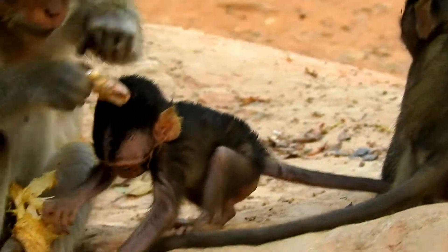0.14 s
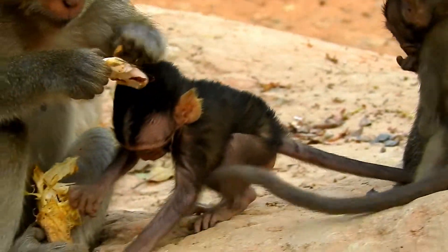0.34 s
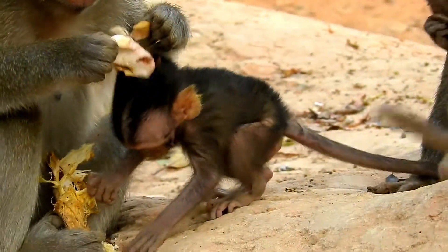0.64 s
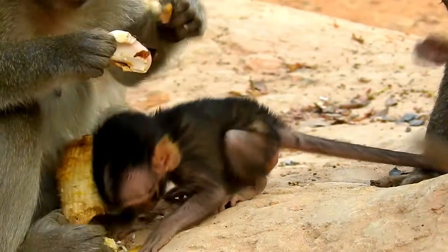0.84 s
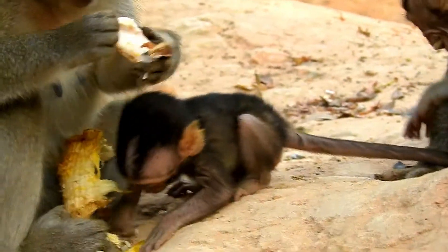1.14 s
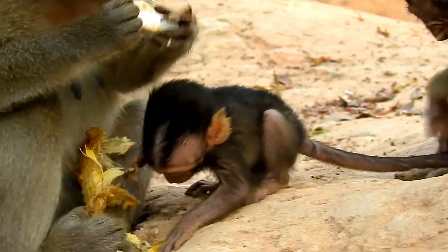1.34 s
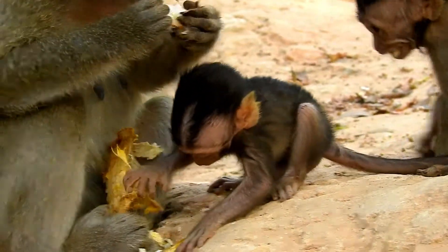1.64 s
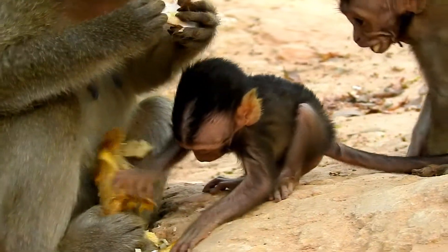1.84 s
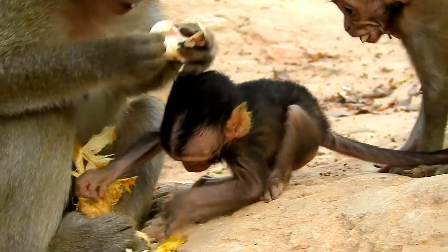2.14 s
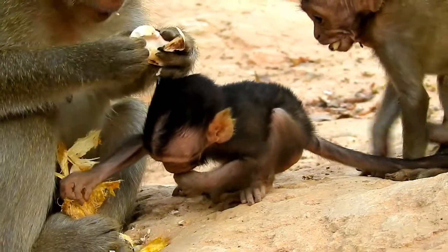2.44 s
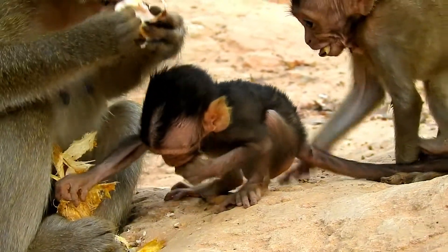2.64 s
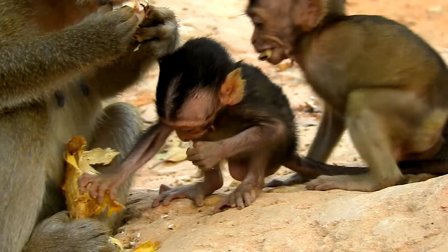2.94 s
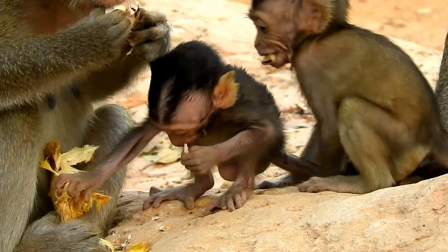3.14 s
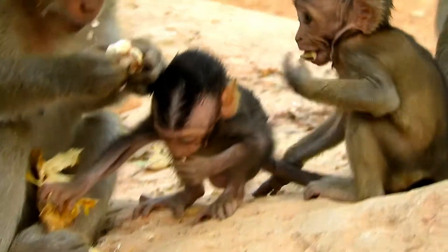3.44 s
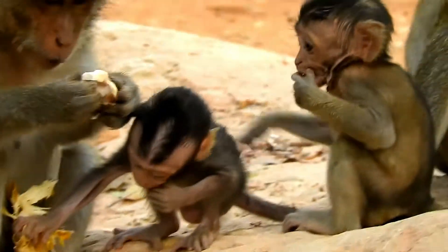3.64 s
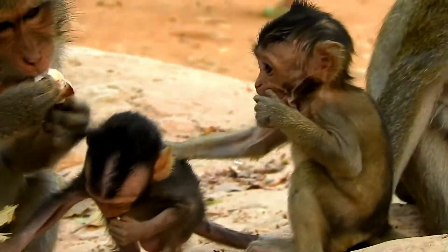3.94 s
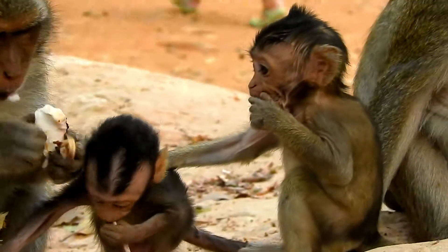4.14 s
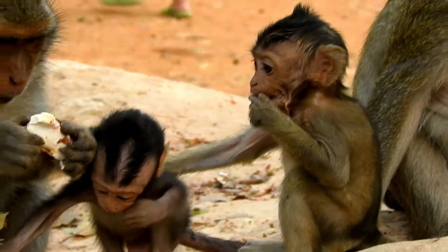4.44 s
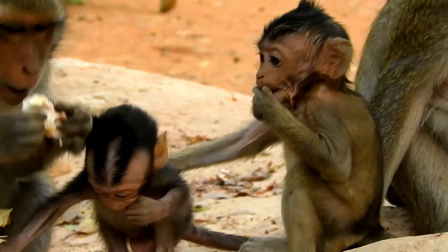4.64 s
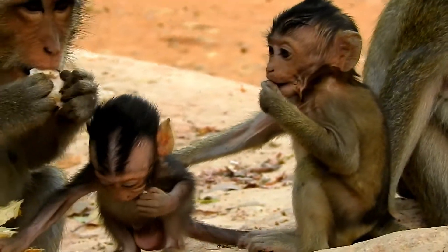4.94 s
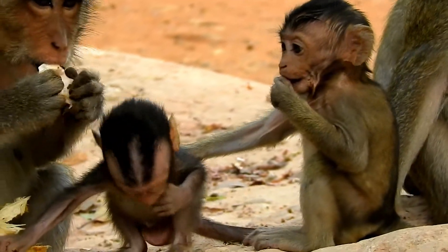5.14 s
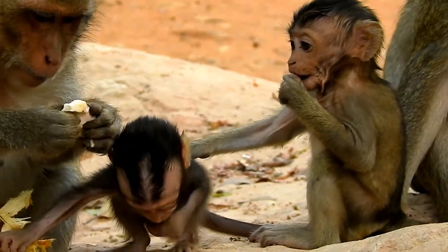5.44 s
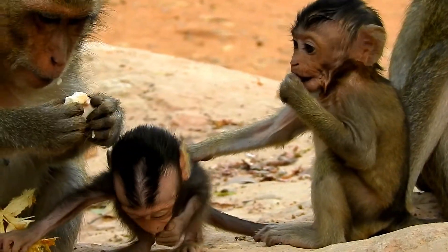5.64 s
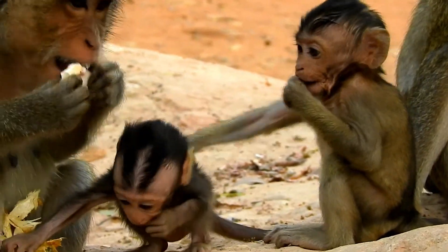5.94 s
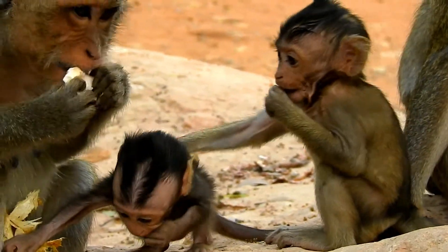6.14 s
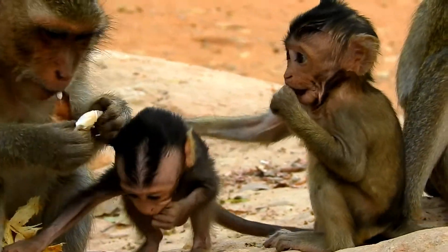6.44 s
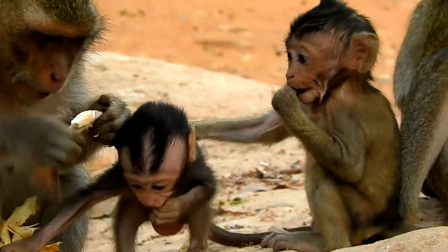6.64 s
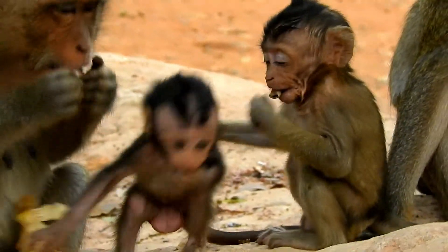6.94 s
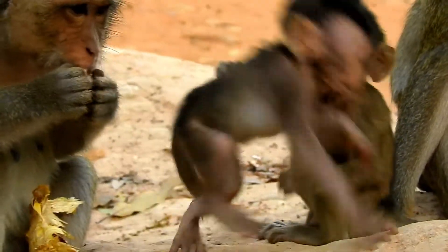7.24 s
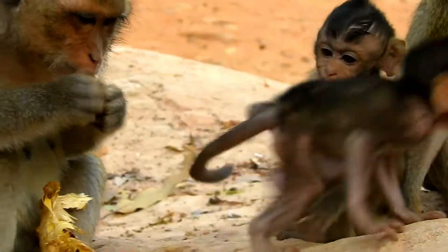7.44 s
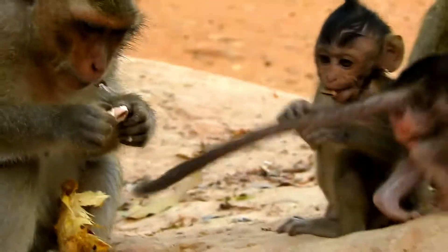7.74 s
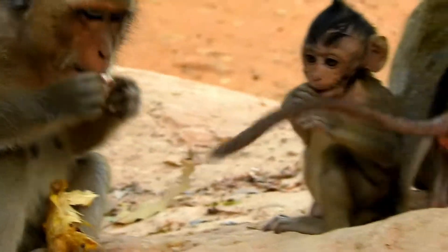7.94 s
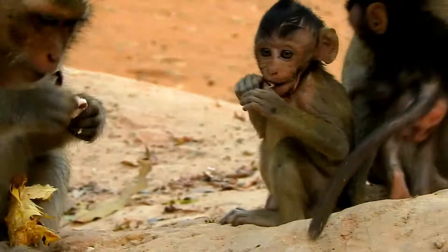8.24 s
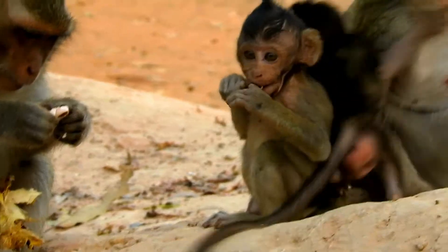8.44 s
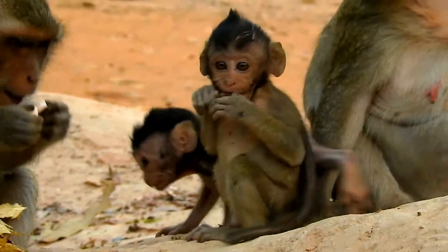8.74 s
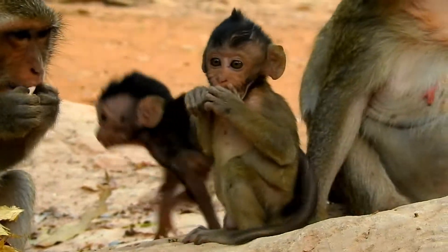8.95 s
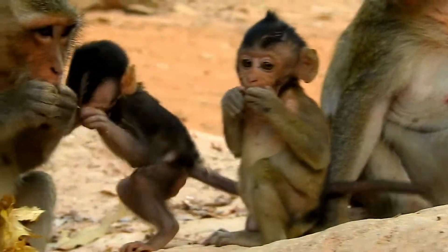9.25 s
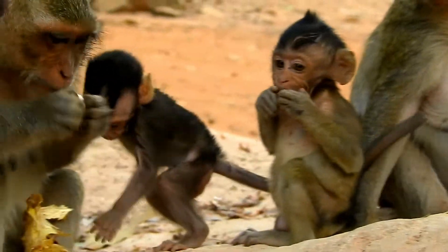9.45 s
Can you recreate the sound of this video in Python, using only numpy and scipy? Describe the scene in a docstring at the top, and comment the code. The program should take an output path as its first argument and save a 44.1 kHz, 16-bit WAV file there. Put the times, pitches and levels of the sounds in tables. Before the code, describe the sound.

For about nine and a half seconds, a close cicada on the left holds a piercing, buzzing whine, mainly near 4.9 kHz with a thinner tone near 8.2 kHz. Its pitch zigzags slightly every 0.7 seconds, brightening in about three surges a second, smeared by echoes off trees. Distant insects add a blurred shimmer. Beneath, an engine idles with deep thumps at about seventeen per second over traffic rumble and broad hiss. Leaf rustles crackle at 1.1 to 1.7 seconds. Echoing bird whistles drop quickly and level out at 0.85, 3.9 and 5.95 seconds, with a very faint one at 7.7. The engine eases around 4.5 to 6.8, with a hollow pipe hum emerging, then grows louder and raspier from 7.2. Gritty scuffs come at 6.8 to 7.5 as the baby monkey scrambles, then leafy rustling at 8.5 and a sharper crackle at 8.8. Rumble and whine finish strongest.

```python
"""A cicada whines close on the left: a fast click train, summed from overtones of a rate that zigzags in a
repeating figure, with echoes off the trunks. More insects sing far off as noise in narrow bands.
An engine idles nearby, filtered firing pulses plus gas noise, over shaped-noise traffic rumble and hiss.
A bird drops falling whistles, swept sines, and monkeys scuff dry leaves and grit, trains of tiny cracks."""
import sys
import numpy as np
from scipy import signal
from scipy.fft import rfft, irfft, next_fast_len
from scipy.io import wavfile
from scipy.ndimage import uniform_filter1d, map_coordinates

SR = 44100
rng = np.random.default_rng(int(sys.argv[2]) if len(sys.argv) > 2 else 0)


def file_out(sig):
    """Save sig as 16-bit WAV at sys.argv[1]."""
    # one column per channel
    cols = np.atleast_2d(sig).T
    # limit, then scale
    lim = np.clip(cols, -1, 1)
    pcm = np.round(lim * 32767).astype(np.int16)
    wavfile.write(sys.argv[1], SR, pcm)


N = 423360
T = np.arange(N) / SR

# cicada overtones as multiples of the click rate; halves come from the two ribbed drums taking turns
MULTIPLES = [4, 5, 5.5, 6, 7, 8, 9, 10, 10.5, 11, 11.5, 12, 13, 14, 15, 15.5, 16, 17, 18, 19, 20, 21, 25]
# strength of each overtone: (relative level [dB], left over right [dB])
OVERTONES = [(-35, -3), (-6.5, 2), (-35, 2), (-31, 1), (-33, 2), (-30.5, 13), (-21, -4), (7.5, 4.5),
             (-33, 2), (-10.5, 9), (-61, -2), (-13, 10), (-23.5, -10), (-17.5, 0), (-3, 7.5), (-49, -1),
             (-22.5, 0), (-36, -2), (-58, 1), (-33.5, -6), (-19.5, 4), (-62, -4), (-59, 3)]


def amp(db):
    """Amplitude factor of a level in dB."""
    return np.exp(np.asarray(db) * np.log(10) / 20)


def unit(x):
    """x scaled to rms 1."""
    return x / np.sqrt(np.mean(x ** 2) + 1e-20)


def gain_at(points, hz):
    """Gain of (Hz, dB) points on a log frequency axis, -120 dB outside them."""
    f, db = np.transpose(points)
    level_db = np.interp(np.log(hz + 1), np.log(f + 1), db, left=-120, right=-120)
    return amp(level_db)


def curves(rows, t=T, period=None):
    """One value per sample for each column after the time."""
    s, *cols = np.transpose(rows)
    return [np.interp(t, s, c, period=period) for c in cols]


def wobble(knots_per_s):
    """Smooth random curve: a spline through normal knots."""
    knots = rng.standard_normal(int(N * knots_per_s / SR) + 4)
    return map_coordinates(knots, [T * knots_per_s])


def filtered(x, response):
    """x with its spectrum times response(hz), zero-padded against wrap-around."""
    m = next_fast_len(x.shape[-1] + 8192)
    hz = np.fft.rfftfreq(m, 1 / SR)
    return irfft(rfft(x, m) * response(hz), m)[..., :x.shape[-1]]


def stereo(pair):
    """Two unrelated signals shared between the microphone ports: alike in the bass, apart in the treble."""
    # left-right correlation: (frequency [Hz], correlation [0-1])
    likeness = [(60, .995), (200, .998), (630, .96), (1400, .86), (3000, .9), (6500, .4), (12000, .25)]
    f, alike = np.transpose(likeness)

    def mid_side_gains(hz):
        correlation = np.interp(np.log(hz + 1), np.log(f), alike)
        angle = np.arccos(np.clip(correlation, -1, 1)) / 2
        return np.array([np.cos(angle), np.sin(angle)])

    mid, side = filtered(pair, mid_side_gains)
    return np.array([mid + side, mid - side])


def noise(response):
    """Stereo noise of rms 1, coloured by response(hz)."""
    white = rng.standard_normal((2, N))
    return unit(filtered(stereo(white), response))


def trees(x, t60_s, wet_db):
    """x plus echoes off the trunks: clumpy decaying noise, dulled by leaves and air."""
    # echo colour: (frequency [Hz], gain [dB])
    echo_colour = [(1000, 0), (3000, 0), (5500, -5), (8000, -8), (15000, -13)]
    t = np.arange(SR) / SR
    decay = amp(-60 * t / t60_s + 3 * wobble(40)[:SR])
    tail = stereo(rng.standard_normal((2, SR))) * decay * (t > .01)
    tail = filtered(tail / np.linalg.norm(tail[0]), lambda hz: gain_at(echo_colour, hz))
    # the last second stands in for the sound before the start, so echoes are there from the first sample
    extended = np.hstack([x[:, -SR:], x])
    echoes = signal.fftconvolve(extended, tail, axes=1)
    return x + amp(wet_db) * echoes[:, SR:SR + N]


def cicada():
    """Overtones of the click rate; echoes of earlier pitches beat against the present one."""
    # turning points of the repeating zigzag: (time in figure [s], click rate [1/s])
    zigzag = [(0, 542.4), (.14, 551.4), (.225, 546.5), (.28, 551.4), (.335, 544.2), (.42, 551),
              (.55, 544.5), (.625, 549.6)]
    # course of the song: (time [s], loudness [dB], belly resonance on low overtones [dB])
    song_course = [(0, -27, -3), (1, -27.5, -1), (6.8, -27, -0.5), (7.6, -26, -0.5), (9.6, -24.5, -8.5)]
    figure_s, surge_s = .677, .19
    rest_effort_db, surge_db = -3.2, 3.2  # spectral tilt per 4 multiples about the 8th

    rate, = curves(zigzag, period=figure_s)
    rate = uniform_filter1d(rate, size=700)
    rate = rate + .4 * wobble(1.2) + .4 * wobble(25)
    phase = 2 * np.pi * np.cumsum(rate) / SR

    # two surges a figure, the first at surge_s
    surge = np.cos(2 * np.pi * (T - surge_s) / figure_s) ** 4
    effort_db = rest_effort_db + surge_db * surge + 1.3 * wobble(9)
    loudness_db, belly_db = curves(song_course)
    shimmer_db = 2.7 * wobble(6)  # moving air makes each overtone swell and sink on its own

    song = np.zeros((2, N))
    starts = rng.uniform(0, 2 * np.pi, len(MULTIPLES))
    for k, (db, pan_db), start in zip(MULTIPLES, OVERTONES, starts):
        # more effort is brighter
        level = amp(db + effort_db * (k - 8) / 4 + belly_db * (k < 9))
        level *= amp(np.roll(shimmer_db, int(k * SR / 3)))
        left = level * np.exp(1j * (k * phase + start))
        right = left * np.exp(-.007j * k * k)  # right port lags, the high overtones most
        song += amp([[pan_db / 2], [-pan_db / 2]]) * np.real([left, right])
    return amp(loudness_db) * trees(song, t60_s=.55, wet_db=3)


def chorus():
    """Far cicadas of the same kind, a little lower and blurred, and other insects: noise in narrow bands."""
    # other far insects: (centre [Hz], width [Hz], level [dB])
    other_insects = [(1579, 59, -56), (2668, 325, -46.5), (5360, 560, -43), (5500, 480, -45.5),
                     (8310, 830, -51.5), (9350, 80, -58), (12080, 81, -67.5), (13300, 70, -69)]
    cicadas = [(542.5 * k, 8 * k, db - 32 - .4 * k) for k, (db, _) in zip(MULTIPLES, OVERTONES)]
    voices = cicadas + other_insects

    def band(hz, centre_hz, width_hz, db):
        density = np.sqrt(SR / width_hz / 2)  # keeps band power independent of width
        return amp(db) * density * np.exp(-2 * ((hz - centre_hz) / width_hz) ** 2)

    insects = filtered(stereo(rng.standard_normal((2, N))), lambda hz: sum(band(hz, *v) for v in voices))
    return insects * amp([[1.5], [-1.5]]) * amp(1.5 * wobble(6.5))


def engine():
    """One exhaust thump per firing with a puff of gas noise, plus pipe resonance, drone and rasp."""
    # running state: (time [s], firing rate [1/s], level [dB], pipe resonance level [dB])
    running = [(0, 16.5, -36.5, -59), (3, 17.5, -33, -53.5), (4.5, 16.8, -38.5, -42.5),
               (6.8, 18.1, -39, -38.5), (7.25, 18.2, -30, -38.5), (8.5, 17.4, -26, -41.5),
               (9.6, 18.6, -26.5, -46)]
    # exhaust response: (frequency [Hz], gain [dB])
    exhaust = [(26, -40), (45, -21), (97, 0), (136, 3), (176, -14.5), (232, -3.5), (295, -26), (339, -17.5),
               (384, -28), (499, -36), (552, -26), (900, -42), (1170, -61), (1980, -120)]
    drone_db = -45.5
    rasp_db, rasp_onset_db, rasp_knee_db = -41, -29, 1.2  # comes in as the engine level passes the onset

    rate, level_db, pipe_db = curves(running)
    cycles = np.cumsum(rate + .06 * wobble(3)) / SR  # one per firing
    angle = 2 * np.pi * cycles
    firings = np.diff(np.floor(cycles), prepend=0) * amp(1.6 * wobble(18))

    thumps = unit(filtered(firings, lambda hz: gain_at(exhaust, hz)))
    puffs = unit(noise(lambda hz: gain_at(exhaust, hz)) * (1 + np.cos(angle)) ** 2)
    pipe = unit(filtered(firings, lambda hz: np.exp(-((hz - 330) / 28) ** 2)))
    drone = np.sqrt(2) * np.sin(angle * 3)  # third order of the firing rate

    rasp_gate = 1 / (1 + np.exp((rasp_onset_db - level_db) / rasp_knee_db))
    rasp_noise = noise(lambda hz: np.exp(-((hz - 470) / 150) ** 2))
    rasp = amp(rasp_db) * rasp_gate * (1 + .5 * np.cos(angle)) * rasp_noise

    body = amp(level_db) * (thumps + .57 * puffs)
    return body + amp(pipe_db) * pipe + amp(drone_db) * drone + rasp


def traffic():
    """Low rumble and the broad hiss of the surroundings, which swells with it."""
    # rumble course: (time [s], level [dB])
    rumble_course = [(0, -28.5), (5.5, -27.5), (7, -26), (8.6, -25.5), (9.6, -23.5)]
    # rumble and hiss spectra: (frequency [Hz], relative density [dB per Hz])
    rumble_colour = [(15, -63), (25, -33), (30, -23), (41, -16), (65, -3), (124, -1), (145, 0), (183, -5),
                     (281, -9), (311, -13.5), (379, -21), (500, -41), (650, -80), (1100, -120)]
    hiss_colour = [(250, -32), (400, -2), (700, -3), (1200, -6.5), (2000, -10), (3500, -13), (5000, -12),
                   (6300, -7.5), (7400, -12.5), (8500, -32), (9600, -32), (11000, -52), (13000, -70)]
    hiss_start_db, hiss_db_per_rumble_db = -39.5, 1

    rumble_db, = curves(rumble_course)
    hiss_db = hiss_start_db + hiss_db_per_rumble_db * (rumble_db - rumble_db[0])
    rumble = amp(rumble_db + .63 * wobble(3.11)) * noise(lambda hz: gain_at(rumble_colour, hz))
    hiss = amp(hiss_db + 1.2 * wobble(6)) * noise(lambda hz: gain_at(hiss_colour, hz))
    return rumble + hiss


def bird():
    """Each whistle is a sine that falls fast and levels out; the trees smear it."""
    # whistles: (time [s], start [Hz], end [Hz], fall time constant [s], length [s], level [dB])
    whistles = [(.852, 3450, 2190, .045, .3, -40.5), (3.895, 2600, 1940, .04, .2, -43),
                (5.955, 3800, 2175, .036, .28, -40), (7.68, 2600, 1950, .05, .14, -51)]
    out = np.zeros(N + SR)
    for s, start_hz, end_hz, fall_s, length_s, db in whistles:
        t = np.arange(int(length_s * SR)) / SR
        hz = end_hz + (start_hz - end_hz) * np.exp(-t / fall_s)
        hz = hz + 30 * wobble(80)[:len(t)]  # breathy waver
        shape = np.clip(t / .02, 0, 1) * (1 - t / length_s) ** .5
        tone = np.sin(2 * np.pi * np.cumsum(hz) / SR)
        out[round(s * SR):][:len(t)] += amp(db) * shape * tone
    flutter_and_pan_db = 3.6 * wobble(45) + [[.6], [-.6]]
    return trees(out[None, :N] * amp(flutter_and_pan_db), t60_s=1.4, wet_db=3)


def scuffs():
    """Hands and feet on dry leaves and grit: dense tiny uneven cracks under a quick rise and a fade."""
    # scuffs: (time [s], envelope time scale [s], level [dB], leaves over grit [dB])
    contacts = [(1.1, 0.17, -33.5, 6), (1.24, 0.072, -39.5, 7), (1.446, 0.12, -36.5, 4),
                (1.52, 0.13, -37.5, -1), (1.636, 0.033, -38, 12), (6.81, 0.24, -33.5, -3),
                (6.962, 0.23, -38.5, -2), (7.16, 0.062, -34, -9), (7.27, .09, -39, -1),
                (7.35, .07, -44, -9), (8.45, .18, -37.5, 3), (8.825, 0.055, -31, 8), (8.905, 0.14, -39, 12)]
    # leaf and grit spectra: (frequency [Hz], relative density [dB per Hz])
    leaf_colour = [(1500, -30), (2500, -7), (3800, 0), (5500, 0), (7000, -4), (9000, -22), (12000, -50)]
    grit_colour = [(300, -14), (650, 0), (1600, 0), (2300, -6), (3500, -22), (5000, -50)]
    clumps_per_s, clump_db = 80, 1.6

    levels = np.zeros((2, N + SR))  # leaves, grit
    for s, scale_s, db, leaves_db in contacts:
        u = np.arange(int(3 * scale_s * SR)) / (scale_s * SR)
        split_db = np.array([[leaves_db], [-leaves_db]]) / 2
        levels[:, round(s * SR):][:, :len(u)] += amp(db + split_db) * 9 * u * np.exp(-4 * u)

    out = np.zeros((2, N))
    for colour, level in zip((leaf_colour, grit_colour), levels):
        hits = rng.random(N) < .12
        cracks = rng.standard_normal((2, N)) * hits * amp(1.2 * rng.exponential(size=N))
        clumps = unit(amp(clump_db * wobble(clumps_per_s)))
        texture = unit(filtered(stereo(cracks), lambda hz: gain_at(colour, hz)))
        out += level[:N] * clumps * texture
    return out


def scene():
    """Sum of all sources."""
    return cicada() + chorus() + engine() + traffic() + bird() + scuffs()


def record(dry):
    """Band limit: nothing from 14.5 kHz up is kept."""
    top_hz = 14500
    return filtered(dry, lambda hz: hz < top_hz)


dry = scene()
out = record(dry)
file_out(out)
```